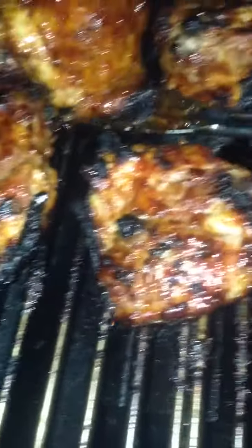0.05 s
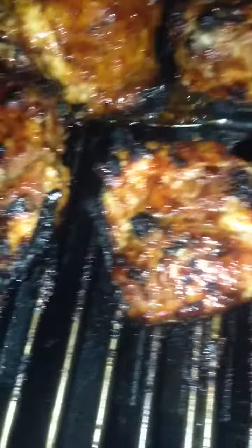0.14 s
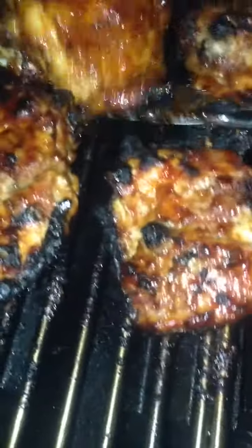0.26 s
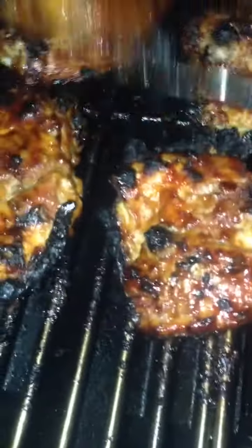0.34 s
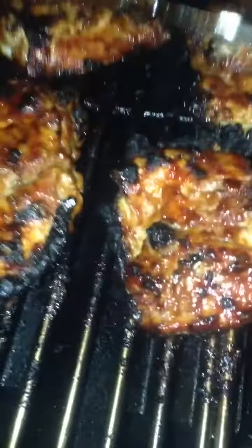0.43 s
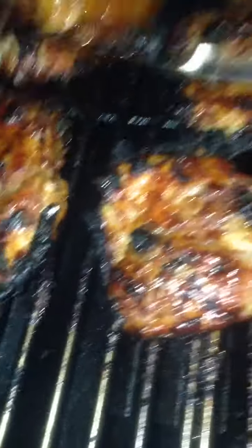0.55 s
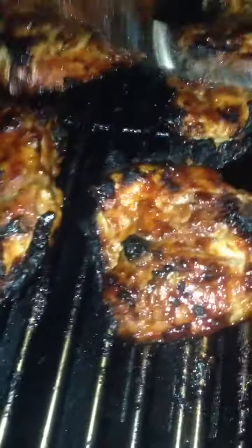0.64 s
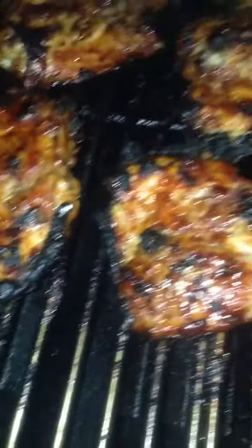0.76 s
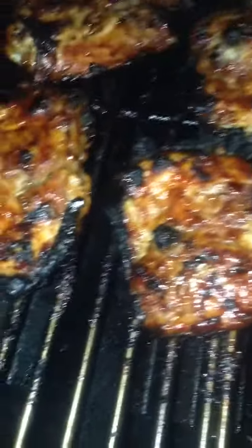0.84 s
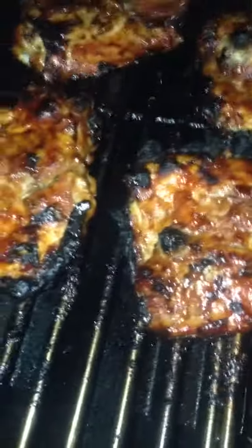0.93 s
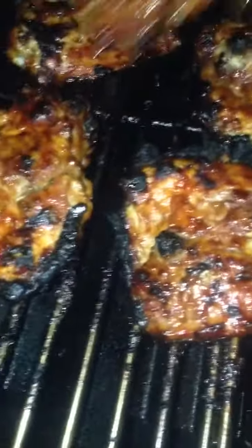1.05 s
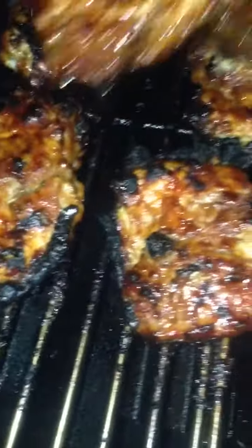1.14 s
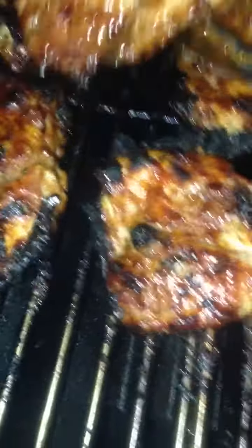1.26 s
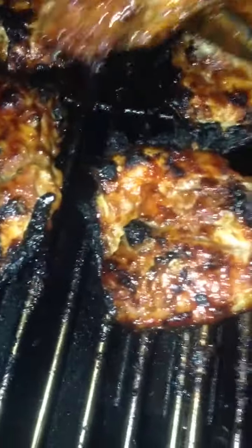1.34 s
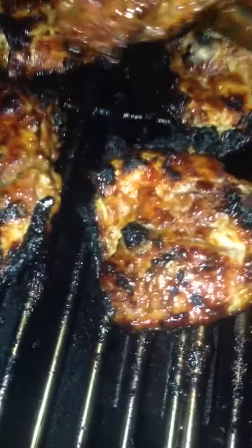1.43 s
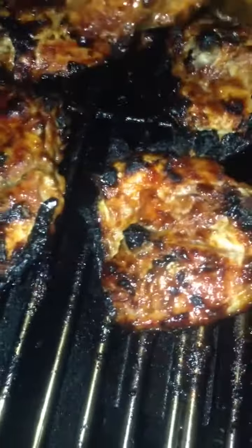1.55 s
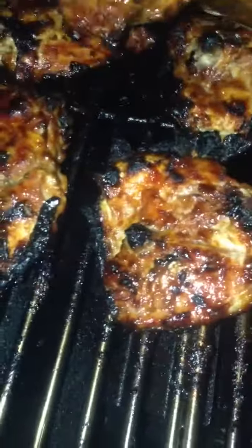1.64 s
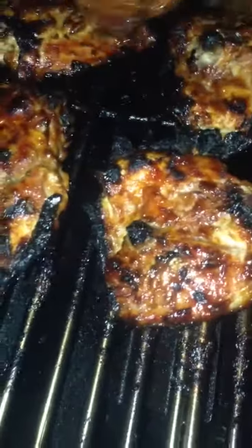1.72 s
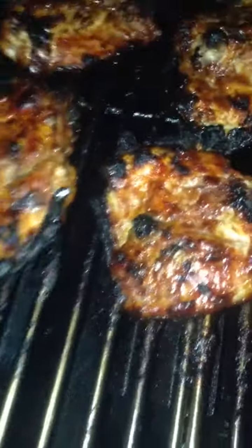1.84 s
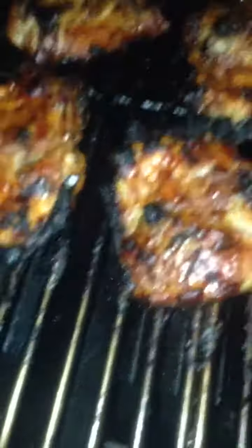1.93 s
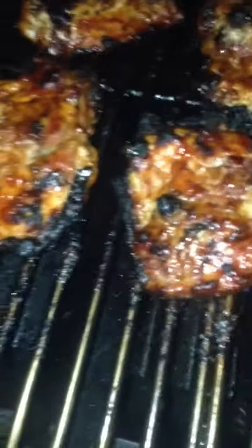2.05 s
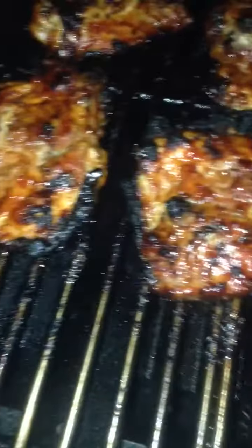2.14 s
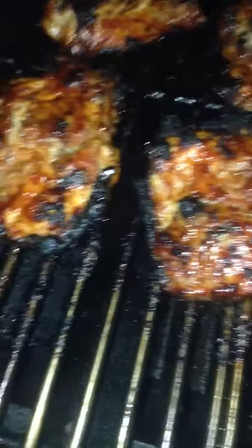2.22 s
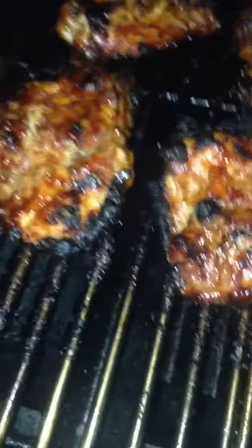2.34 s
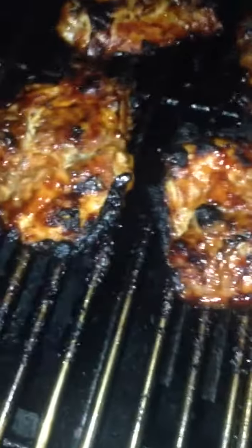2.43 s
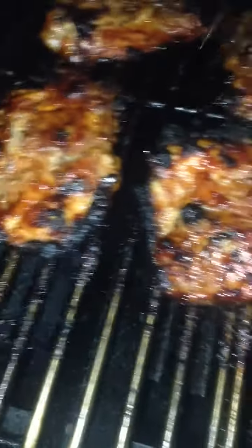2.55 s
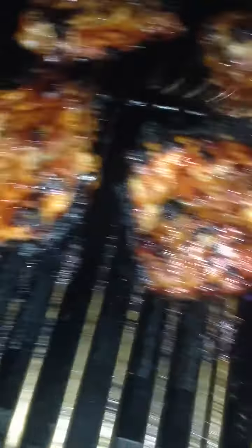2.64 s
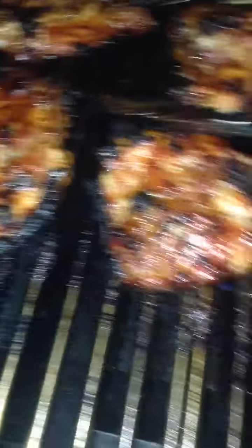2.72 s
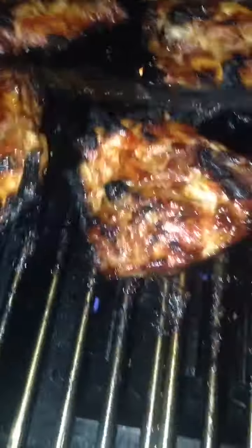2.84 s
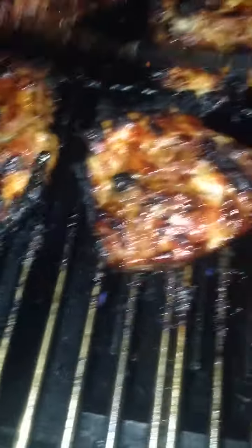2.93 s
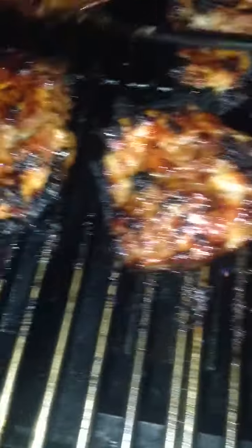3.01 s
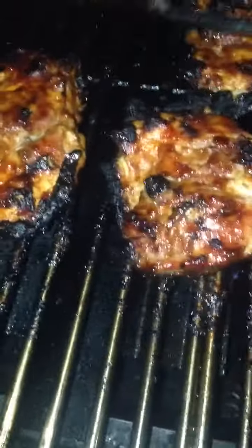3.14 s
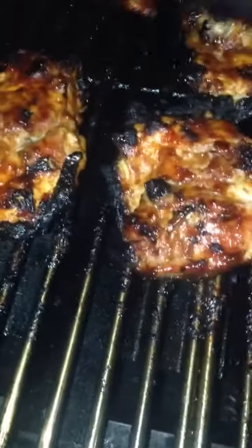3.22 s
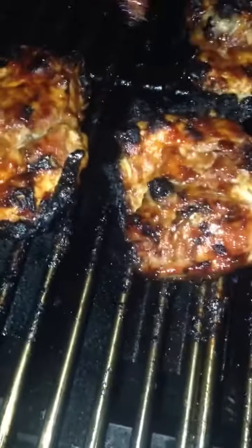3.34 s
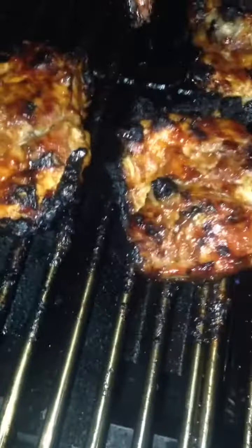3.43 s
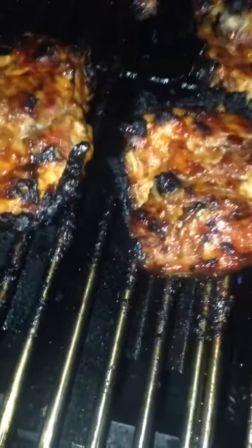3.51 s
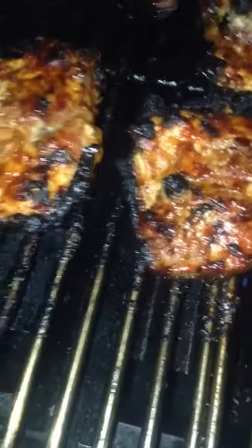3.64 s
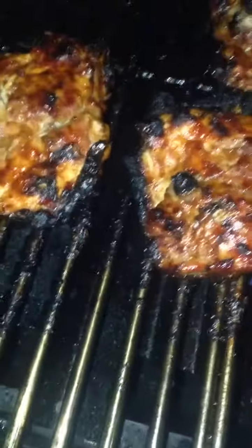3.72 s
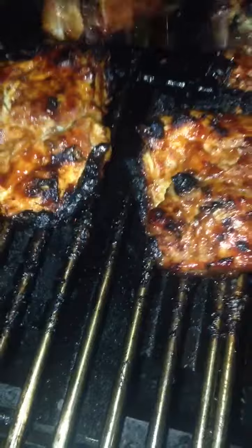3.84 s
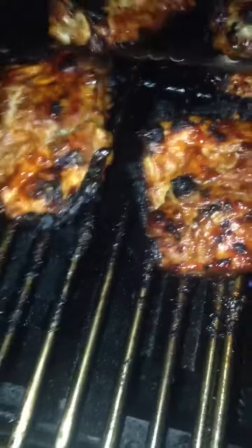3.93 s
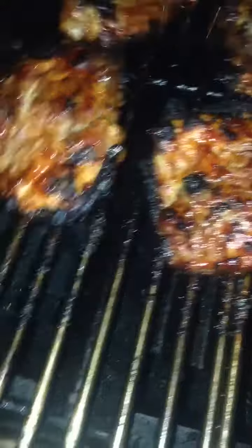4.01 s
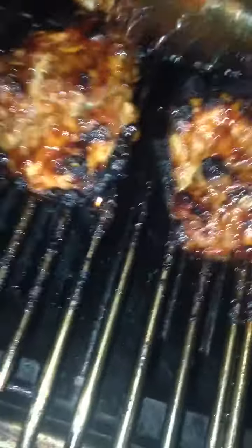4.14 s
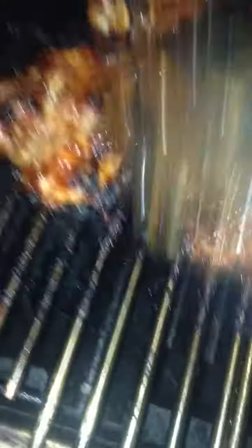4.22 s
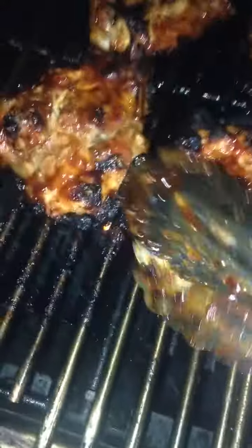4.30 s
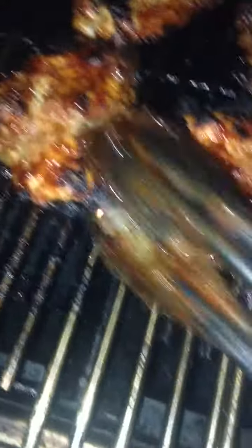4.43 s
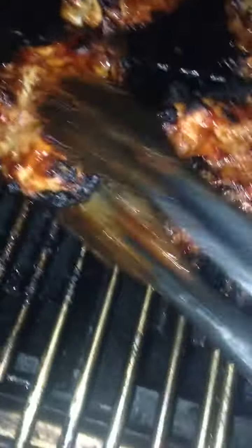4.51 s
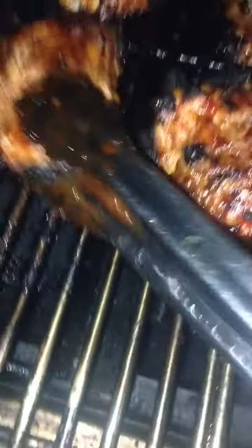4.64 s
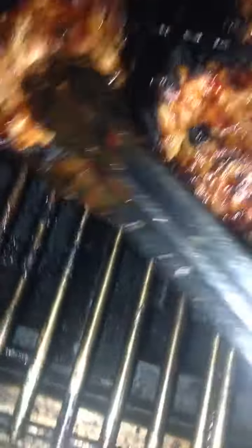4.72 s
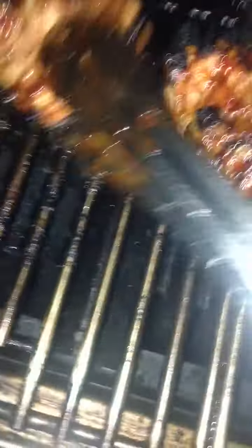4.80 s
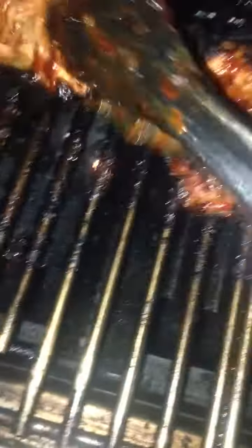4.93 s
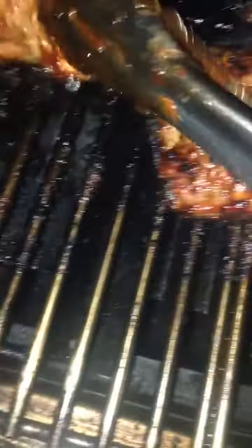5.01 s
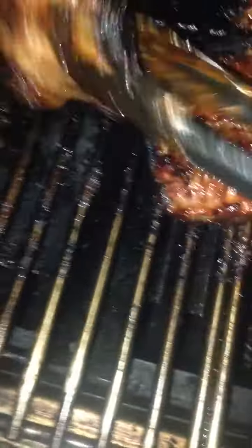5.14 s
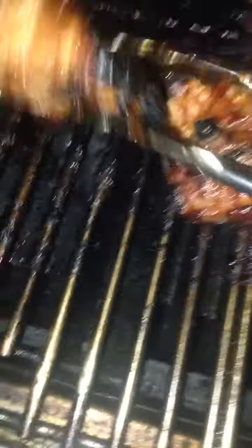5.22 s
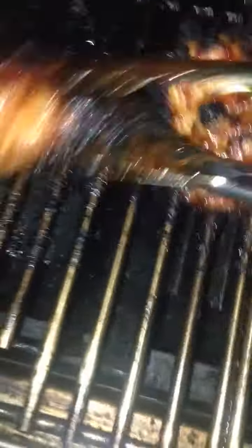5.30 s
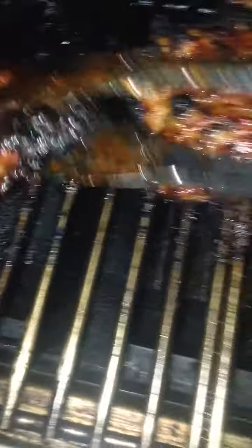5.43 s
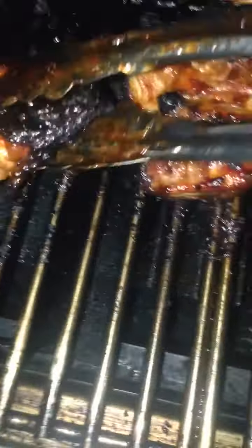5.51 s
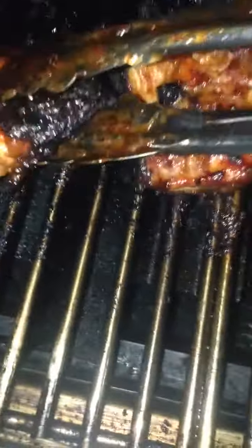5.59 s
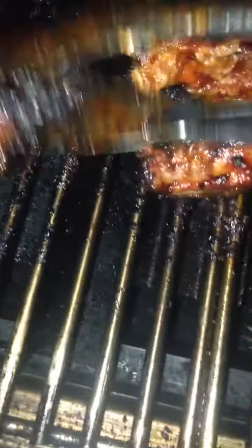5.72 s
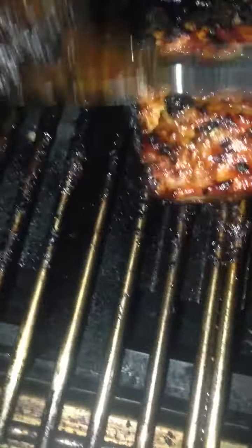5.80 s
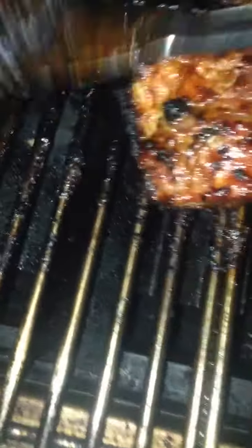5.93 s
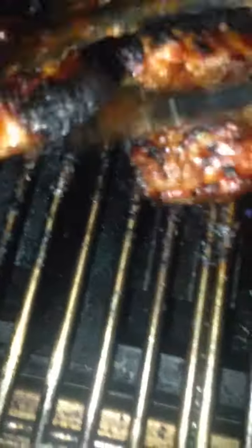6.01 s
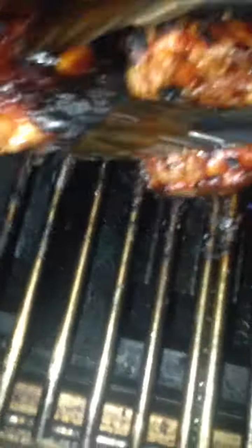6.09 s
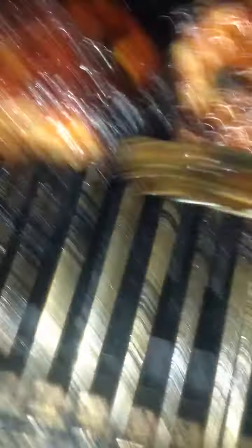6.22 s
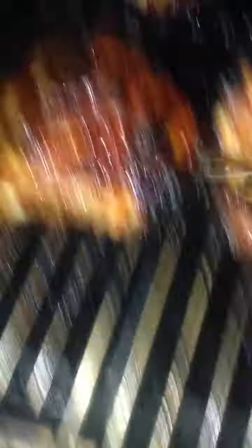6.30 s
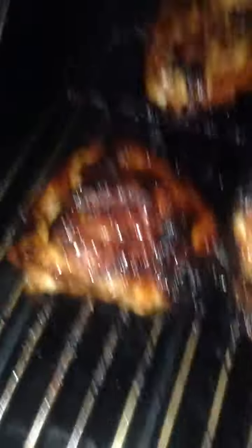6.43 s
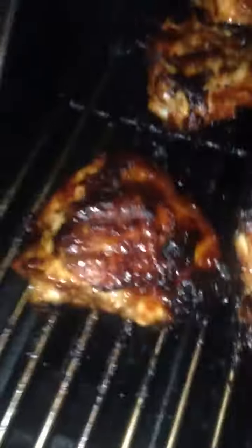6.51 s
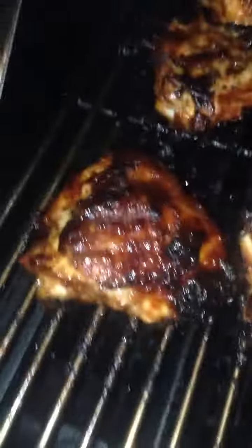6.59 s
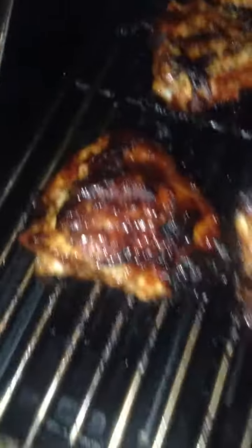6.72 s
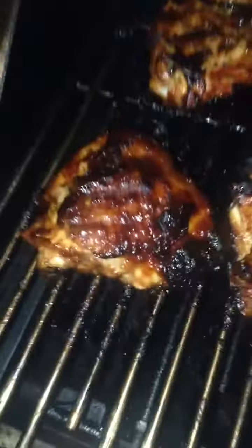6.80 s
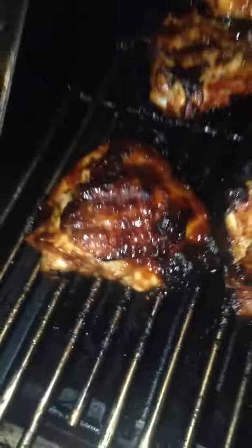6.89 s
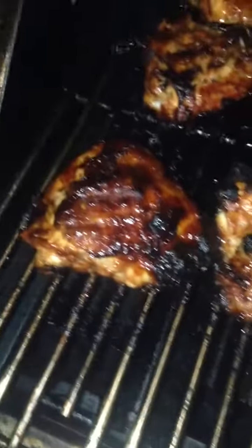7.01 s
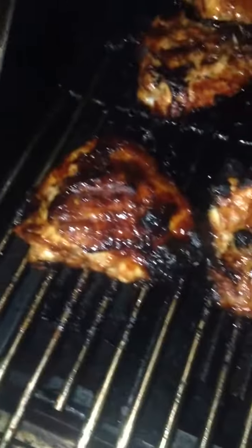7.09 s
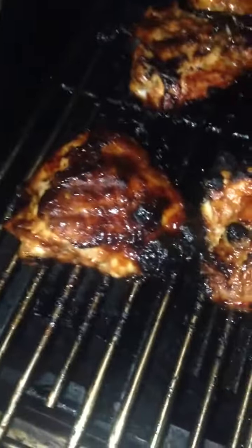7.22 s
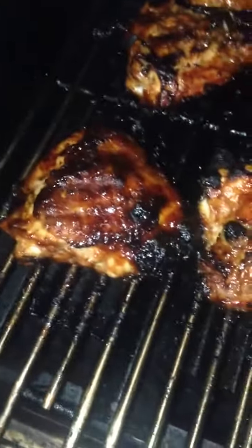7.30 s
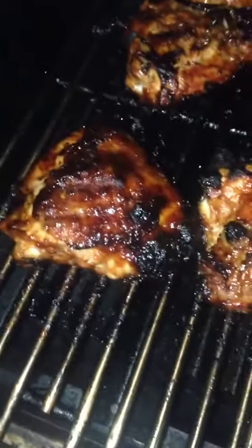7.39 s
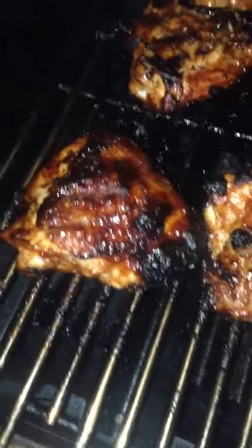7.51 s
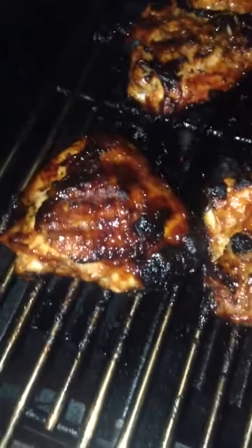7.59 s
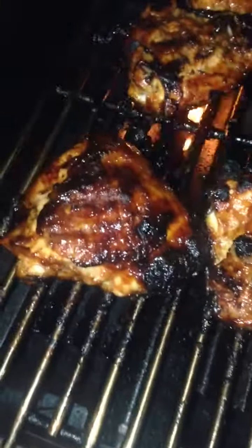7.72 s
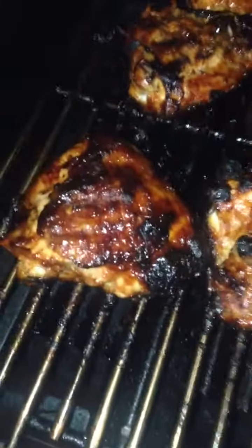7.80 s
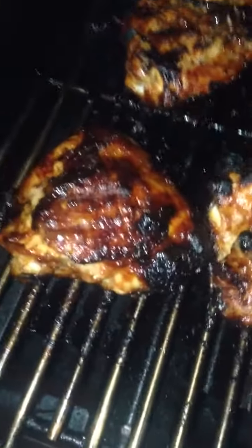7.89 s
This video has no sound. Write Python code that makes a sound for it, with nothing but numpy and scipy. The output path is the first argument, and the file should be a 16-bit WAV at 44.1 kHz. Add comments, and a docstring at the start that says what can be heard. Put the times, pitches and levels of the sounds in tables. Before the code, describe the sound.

Close to a hand-held microphone, chicken fries on a grill grate with a steady, crackling hiss, spitting and popping over the faint low murmur of the gas flame. The sizzle slowly softens, and there are a few dull handling bumps. Past the middle, tongs give a short metallic knock, sticky glaze briefly rasps off the bars and the hiss grows. A second knock follows, then more pops and a final surge.

```python
"""Sauced chicken sizzles on a gas grill, close to a hand-held mono microphone.
Countless tiny steam bubbles burst into a hiss that surges when juice meets hot metal; larger ones
pop and spit. The burner murmurs in the hollow of the grill, soft bumps reach the microphone,
dripping fat flares up and steam sings under the meat. Later, tongs knock on the loose grate
and sticky glaze tears off the bars."""
import sys
import numpy as np
from scipy import signal
from scipy.fft import rfft, irfft
from scipy.io import wavfile
from scipy.ndimage import uniform_filter1d

SR = 44100
rng = np.random.default_rng(int(sys.argv[2]) if len(sys.argv) > 2 else 0)


def bounce(signal):
    """Save signal as a 16-bit WAV file at the path given by the first command-line argument."""
    frames = np.transpose(np.atleast_2d(signal))
    limited = np.clip(frames, -1, 1)
    pcm = np.round(limited * 32767).astype(np.int16)
    wavfile.write(sys.argv[1], SR, pcm)


N = 350595
TIME, HZ = np.arange(N) / SR, np.fft.rfftfreq(N, 1 / SR)

# The tone of the sizzle, from low to high: (frequency [Hz], level [dB])
SIZZLE_TONE = [(260, -11), (450, -10), (514, -15), (641, -10), (765, -6), (836, -9.5), (1070, -7.5),
               (1190, -3.5), (1860, -4), (2000, -1.5), (3940, 2), (6700, 1.5), (13600, 0), (14600, 1),
               (15300, -2.5)]
# Juice meets hot metal and flashes to steam:
# (start [s], rise [s], hold [s], fade [dB/s], level [dB], fine fizz against that level [dB])
JUICE_SURGES = [(-0.03, .02, 0.036, 20.5, -31, 4), (0.5, 0.018, 0.094, 147, -46, 5),
                (0.794, 0.041, 0.25, 41, -36, 7), (1.908, .03, .04, 120, -40, -6),
                (2.2, .03, .04, 95, -42.5, -6), (2.69, 0.018, 0.021, 200, -39, -10),
                (4.415, 0.12, 0.12, 1, -41.2, 3.5), (4.88, 0.054, .5, -2.5, -40.5, -3.5),
                (5.12, 0.018, 0.34, 9, -44.5, 1.5), (6.143, 0.048, 0.24, 32, -43, 2.5),
                (6.28, 0.073, 0.02, 44, -38.5, 4.5), (6.672, 0.023, 0.035, 119, -40.5, -9),
                (7.332, 0.22, 0.29, 58, -43, 2), (7.553, 0.028, 0.073, 30, -34, 4)]
# The boiling eases off for a moment: (time [s], half length [s], depth [dB])
BOIL_LULLS = [(0.666, 0.022, 3.5), (0.77, 0.074, 1), (1.78, 0.041, 1), (2.152, 0.045, 2), (2.62, 0.06, 1.4),
              (3.2, 0.55, 0.4), (3.813, 0.034, 1.5), (4.04, 0.04, 1), (4.375, 0.065, 2.2), (4.67, 0.035, 1),
              (4.85, 0.02, 1), (6.1, 0.043, 2), (7.18, 0.31, 1.2)]
# How loud the burner's flame is: (time [s], level [dB])
FLAME_LEVELS = [(0.0, -56.5), (0.74, -56), (0.89, -54), (1.58, -57.5), (3.13, -59), (4.25, -66.5),
                (4.79, -58.5), (5.73, -62.5), (7.22, -57.5), (7.6, -51.5), (7.95, -59)]
# Pitches at which the air inside the grill rings: (frequency [Hz], width [Hz], level [dB])
FIREBOX_RESONANCES = [(167, 57, -0.5), (280, 97, -1.5), (370, 65, -2.5), (570, 100, -8)]
# Soft bumps on the microphone: (time [s], level [dB], frequency [Hz])
MIC_BUMPS = [(0.021, -36.5, 70), (0.172, -43, 75), (2.878, -44, 179), (3.32, -50, 65), (3.40, -44, 60),
             (3.443, -37, 120), (3.484, -47, 100), (3.545, -43, 60), (3.587, -45, 125), (3.627, -39.5, 160),
             (3.655, -43, 75), (3.682, -53, 190), (4.01, -44, 85), (4.08, -53, 70), (4.864, -40, 107),
             (4.976, -42, 136), (4.996, -41.5, 110), (5.091, -48, 70), (6.04, -53, 80), (6.404, -47, 75)]
# Bursting blisters that stand out: (time [s], level [dB], pitch [Hz], width [octaves])
BLISTER_POPS = [(0.0396, -29, 2700, 2.6), (0.1228, -28, 8000, 2.8), (0.209, -27, 4970, 3.8),
                (0.343, -31.5, 1160, 4.8), (0.36, -27.5, 4970, 3.7), (0.617, -29.5, 4800, 1.8),
                (0.7139, -34.5, 400, 2.3), (0.785, -32, 6000, 9.2), (0.913, -30, 11000, 2.8),
                (1.1078, -31, 1960, 1.8), (1.117, -28, 5400, 3.4), (1.24, -34.5, 3600, 1.6),
                (1.391, -31.5, 2900, 2.6), (1.808, -40.5, 650, 2), (1.8207, -35, 8000, 2.4),
                (1.8621, -29, 3600, 3.2), (1.938, -35, 3500, 2.4), (2.041, -37.5, 1000, 2.8),
                (2.059, -39, 6500, 2.4), (2.3804, -33, 4800, 2.8), (2.451, -33, 9000, 2.6),
                (2.506, -30, 7000, 2.8), (2.995, -40, 1190, 1.8), (3.0496, -36, 2400, 3.2),
                (3.3643, -38, 5000, 2.1), (3.5173, -38.5, 2920, 2.5), (3.5605, -37, 5000, 3),
                (3.9263, -38.5, 5000, 2), (3.9821, -34, 1770, 1.9), (4.216, -38, 3600, 1),
                (4.2502, -34.5, 3800, 2.9), (4.6, -33, 5400, 3.1), (4.6343, -31, 9500, 1.8),
                (4.7252, -35, 6500, 2.1), (4.9105, -38, 5000, 2.5), (4.958, -35, 2400, 2.4),
                (5.165, -33.5, 8000, 2.6), (5.3075, -31, 9630, 1.4), (5.404, -35, 5500, 3.7),
                (5.432, -37, 1090, 3.1), (5.5346, -37.5, 1700, 3.4), (5.576, -32, 11500, 1.7),
                (5.658, -42, 1810, 3), (5.7912, -27.5, 11000, 4.8), (5.809, -36, 3200, 3),
                (5.848, -37, 2400, 3.1), (5.8538, -41, 1000, 2.8), (6.173, -32.5, 5200, 1.8),
                (6.2075, -42, 700, 2.4), (6.447, -34, 9000, 2), (6.536, -34.5, 1900, 2),
                (6.587, -36.5, 1600, 1.3), (6.7039, -33, 1910, 2), (6.721, -39, 2800, 1.8),
                (6.747, -40, 900, 3.3), (6.871, -44.5, 1600, 1.3), (6.93, -37, 1500, 1.3),
                (7.285, -41.5, 800, 2), (7.3885, -37, 1300, 1.8), (7.4355, -33.5, 2000, 3),
                (7.6197, -30.5, 3300, 3.3), (7.677, -22.3, 10000, 3.1), (7.779, -34.5, 1900, 1.8),
                (7.874, -31.5, 5440, 2.2)]
# Pitches that cancel between grate and pan: (frequency [Hz], width [Hz], share removed [0-1])
PAN_NOTCHES = [(480, 39, 0.41), (870, 130, 0.46)]
# Dripping fat catches fire:
# (start [s], end [s], start pitch [Hz], end pitch [Hz], width [Hz], level [dB])
FAT_FLARES = [(0.215, 0.28, 302, 280, 109, -50.5), (0.72, 0.865, 146.6, 176, 40, -49),
              (0.785, 0.885, 303, 404, 100, -50.5), (2.17, 2.34, 366, 374, 110, -57),
              (2.84, 2.94, 199, 175, 80, -53), (7.635, 7.715, 187, 179, 60, -52.5),
              (7.68, 7.77, 259, 354, 80, -48), (7.725, 7.78, 155, 144, 50, -53)]
# Fat spits in runs of bubbles: (start [s], length [s], level [dB], pitch [Hz], width [octaves])
FAT_SPITS = [(0.508, 0.03, -36, 4000, 2.6), (0.603, 0.031, -39, 3630, 1.5), (0.868, 0.0092, -30, 9000, 2.6),
             (0.978, 0.014, -30, 6500, 3.6), (2.861, 0.034, -41.5, 4000, 2.6),
             (2.937, 0.014, -44, 3400, 1.2), (4.606, 0.012, -36, 7000, 2), (5.436, 0.014, -42, 1600, 2),
             (6.151, 0.022, -43, 4250, 0.9), (6.308, 0.012, -38.5, 3900, 0.83),
             (6.52, 0.016, -45, 2520, 1.5), (7.028, 0.018, -42, 1700, 1.9),
             (7.132, 0.017, -36.5, 2600, 4.4), (7.385, 0.017, -44, 1470, 1.2),
             (7.70, 0.064, -42, 1600, 1.6)]
# Steam sings in gaps under the meat:
# (start [s], end [s], start pitch [Hz], end pitch [Hz], width [Hz], level [dB])
STEAM_WHISTLES = [(0.66, 0.92, 4320, 4340, 220, -55), (2.86, 2.886, 1670, 1650, 140, -47.5),
                  (2.86, 2.885, 4500, 4600, 900, -42), (6.223, 6.6, 1785, 1310, 260, -55),
                  (7.5, 7.68, 9000, 7940, 180, -51)]
# Tongs knock on the grate; the crack is low with meat between the tips, high on bare steel:
# (time [s], ring level [dB], crack level [dB], crack pitch [Hz], rattle level [dB])
TONG_KNOCKS = [(4.622, -24, -35.5, 2050, -44.5), (6.0598, -24, -34.5, 3750, -62)]
# Tones of greasy tongs, damped by hand and meat: (frequency [Hz], level [dB], time to fade 60 dB [s])
TONG_TONES = [(1350, -6, 0.029), (1970, -8, 0.032), (2220, -6, 0.026), (3050, -6, .026), (3300, -6.5, .024),
              (4100, -5, 0.031), (7100, 5, 0.015)]
# Pitches at which the loose grate rings: (frequency [Hz], width [Hz], level [dB])
GRATE_RESONANCES = [(372, 180, -9), (635, 90, 4)]
# Sticky glaze tears off the bars as the meat is lifted: (start [s], length [s], level [dB])
GLAZE_PEELS = [(4.866, 0.11, -43.5)]

SPRAY_MS = 2.06  # how quickly the spray of a wet bubble dies away
ONSET_SAMPLES = 256  # the level of a pop or crack is set over its first 6 ms


def gain_of(db):
    """Turns decibels into a number to multiply by."""
    return 10 ** (np.asarray(db) / 20)


def evened(x):
    """Scales a signal to an average strength (rms) of 1."""
    return x / np.sqrt(np.mean(x ** 2) + 1e-20)


def add(mix, start_s, sound):
    """Mixes a sound in at the given time."""
    part = mix[max(round(start_s * SR), 0):][:len(sound)]
    part += sound[:len(part)]


def filtered(x, response):
    """Turns each frequency in HZ up or down by its gain in the response."""
    return irfft(rfft(x) * response, N)


def below(edge_hz, order):
    """A response that keeps the lows; a higher order cuts more steeply."""
    return 1 / np.sqrt(1 + (HZ / edge_hz) ** (2 * order))


def above(edge_hz, order):
    """A response that keeps the highs."""
    return 1 - below(edge_hz, order) ** 2


def resonance(hz, width_hz):
    """The response of something that rings at one pitch, with gain 1 there."""
    return 1 / (1 + 1j * (HZ ** 2 - hz ** 2) / (width_hz * HZ + 1e-9))


def wander(slow_hz, fast_hz):
    """A random drift of strength 1 that moves mostly between two rates."""
    response = below(fast_hz, order=2) * HZ / (HZ + slow_hz) ** 1.5
    return evened(filtered(rng.standard_normal(N), response))


def by_chance(per_s, samples=N):
    """Picks random sample positions, about per_s of them a second."""
    return np.flatnonzero(rng.random(samples) < per_s / SR)


def boil(fry_db=-33.5, drying_db_per_s=2):
    """Levels of the sizzle and its fine fizz in dB: the meat slowly dries, fresh juice adds surges."""
    power = gain_of(fry_db - drying_db_per_s * TIME) ** 2
    fizz_power = power * gain_of(-0.9 - 0.75 * TIME) ** 2  # the fizz fades first
    for start, rise_s, hold_s, fade_db_per_s, db, fizz_db in JUICE_SURGES:
        age = TIME - start
        faded_db = fade_db_per_s * np.maximum(age - rise_s - hold_s, 0)
        steam = np.clip(age / rise_s, 0, 1) * gain_of(db - faded_db) ** 2
        power += steam
        fizz_power += steam * gain_of(fizz_db) ** 2
    lull_db = sum(db * np.exp(-((TIME - s) / half_s) ** 2) for s, half_s, db in BOIL_LULLS)
    return 10 * np.log10(power) - lull_db, 10 * np.log10(fizz_power) - lull_db


def sputter(per_s, decay_s, steady_s):
    """Splashes from a steady supply of juice flash to steam and die away; the result hovers near 1."""
    splashes = (rng.random(N) < per_s / SR) * np.minimum(rng.exponential(1, N), 3)
    flashes = signal.lfilter([1], [1, -np.exp(-1 / (decay_s * SR))], splashes)
    supply = uniform_filter1d(flashes, round(steady_s * SR))
    return flashes / (supply + flashes.mean() / 20)


def burst(centre_hz, octaves, decay_ms, scatter):
    """One bubble: a snap, a short spray of steam and echoes from the grate; its size sets the pitch."""
    t = np.arange(1024) / SR
    spray = np.exp(-1000 * t / max(decay_ms, 0.2))
    echoes = 0.053 * np.exp(-t / 0.0068)
    snap = scatter * rng.standard_normal(len(t)) * (spray + echoes)
    snap[0] = 1
    reach = 2 ** (max(octaves, 0.5) / 2)
    edges_hz = np.clip([centre_hz / reach, centre_hz * reach], 50, SR / 2 - 1000)
    return signal.sosfilt(signal.butter(2, edges_hz, "band", fs=SR, output="sos"), snap)


def crackle(per_s, spread_db, largest, decay_ms, pitches=32):
    """A swarm of bubbles, most tiny and a few large, balanced so that no pitch stands out."""
    at = by_chance(per_s)
    kind, rank, sign = rng.random((N, 3))[at].T
    size = gain_of(-spread_db * np.log(rank + np.exp(-largest))) * np.sign(sign - 0.5)
    out, power = np.zeros(N), 0
    for k, centre_hz in enumerate(np.geomspace(700, 15000, pitches)):
        bubble = evened(burst(centre_hz, 2.33, decay_ms * rng.uniform(0.4, 1.17), scatter=0.31))
        chosen = (kind * pitches).astype(int) == k
        clicks = np.zeros(N)
        clicks[at[chosen]] = size[chosen]
        out += signal.oaconvolve(clicks, bubble)[:N]  # each click becomes a bubble
        power = power + abs(rfft(bubble)) ** 2
    colour = np.interp(HZ, np.linspace(0, SR / 2, len(power)), uniform_filter1d(power, size=9))
    return evened(filtered(out, 1 / np.sqrt(colour)))


def wall_echoes(x, strength, sway_s, count=7):
    """Adds close echoes from lid and walls; their paths shift as the hand moves, so the tone drifts."""
    out = x.copy()
    for delay_s in np.linspace(0.0009, 0.0048, count):
        path_s = delay_s * rng.uniform(1.0, 1.107)
        hand = np.sin(2 * np.pi * (rng.uniform(0.112, 0.397) * TIME + rng.random()))
        echo = np.interp(TIME - path_s - sway_s * hand, TIME, x)
        out += strength * rng.choice([-1, 1]) * echo
    return out


def sizzle(level_db, fizz_db, usual_db=-42.5):
    """Steam hiss, fine frying and coarser spitting swell and fade together with the boil."""
    activity = 0.62 + 0.35 * sputter(per_s=170, decay_s=0.007, steady_s=0.083)
    hiss = evened(rng.standard_normal(N) * np.sqrt(activity))
    frying = crackle(2900 * activity, spread_db=2.0, largest=4.1, decay_ms=0.48)
    spitting = crackle(260 * activity, spread_db=3.5, largest=3.0, decay_ms=1.7)
    spitting = filtered(spitting, below(3700, order=1))  # larger bubbles are duller
    blend = gain_of(1.0) * hiss + frying + gain_of(-0.5) * spitting
    blend = wall_echoes(blend, strength=0.079, sway_s=0.00012)
    hz, db = np.transpose(SIZZLE_TONE)
    tone = gain_of(np.interp(np.log(HZ + 1), np.log(hz), db))
    blend = filtered(blend, tone * above(190, order=2))
    bubbling_db = usual_db - 9 + 0.85 * (level_db - usual_db)  # the lows are softer and swell less
    unrest = wander(5.2, 7.8)  # the boil is uneven, most of all for the large bubbles
    low, not_high = below(2170, order=3) ** 2, below(8100, order=3) ** 2
    bubbling = evened(filtered(blend, low)) * gain_of(bubbling_db + unrest)
    body = evened(filtered(blend, not_high - low)) * gain_of(level_db - 1.67 + 0.5 * unrest)
    fizz = evened(filtered(blend, 1 - not_high)) * gain_of(fizz_db + 1.0 + 0.35 * unrest)
    return gain_of(-3.0) * (bubbling + body + fizz)


def flame():
    """The swirling flame makes the air inside the grill ring, over a faint steady rumble."""
    firebox = sum(gain_of(db) * resonance(hz, width) for hz, width, db in FIREBOX_RESONANCES)
    swirl = rng.standard_normal(N) * gain_of(3.6 * wander(14, 77))
    roar = evened(filtered(swirl, firebox * below(620, order=3) * above(113, order=3)))
    rumble = filtered(rng.standard_normal(N), below(120, order=2) * above(32, order=3))
    roar_db = np.interp(TIME, *np.transpose(FLAME_LEVELS)) + 0.5 + 1.1 * wander(1.9, 5.7)
    return roar * gain_of(roar_db) + gain_of(-70.5) * evened(rumble)


def bumps(shudder_db=-17.5, shudder_s=0.046):
    """Each bump on the microphone is one low push and pull, with a short uneven shudder around it."""
    out, shudder_level = np.zeros(N), np.zeros(N)
    around = np.arange(-8000, 8000) / SR
    shudder = filtered(rng.standard_normal(N), below(110, order=2) * above(50, order=3))
    shudder = evened(shudder * gain_of(7.0 * wander(12, 30)))
    for s, db, hz in MIC_BUMPS:
        t = around[s + around >= 0]
        push_pull = np.sin(2 * np.pi * hz * t) * np.exp(-(hz * t / 0.43) ** 2)
        add(out, s + t[0], gain_of(db) * push_pull)
        add(shudder_level, s + t[0], gain_of(db) * np.exp(-((t - 0.015) / shudder_s) ** 2))
    return out + gain_of(shudder_db) * shudder_level * shudder


def pops(level_db, dry_above_hz=9500):
    """Blisters of sauce and fat burst one by one: small ones snap, large wet ones plop."""
    out = np.zeros(N)
    for s, db, centre_hz, octaves in BLISTER_POPS + stray_pops(level_db):
        wetness = 1 / (1 + (centre_hz / dry_above_hz) ** 2)
        pop = burst(centre_hz, octaves, SPRAY_MS * wetness, scatter=0.48 * np.sqrt(wetness))
        add(out, s, gain_of(db) * pop / pop[:ONSET_SAMPLES].std())
    notches = [1 - share * resonance(hz, width) for hz, width, share in PAN_NOTCHES]
    return gain_of(-1.2) * filtered(out, np.prod(notches, axis=0))


def stray_pops(level_db, low_hz=420, high_hz=9000, db_per_octave=3.5, octaves=2.6):
    """Lists lesser blisters at random moments; their level follows the boil, and low ones are softer."""
    at = by_chance(per_s=6)
    pitch, softness = rng.random((N, 2))[at].T
    hz = low_hz * (high_hz / low_hz) ** pitch
    db = level_db[at] - 3.5 + db_per_octave * np.log2(hz / 2000) - (2 * softness - 1)
    return [(*row, octaves) for row in zip(at / SR, db, hz)]


def snaps(fizz_db, above_fizz_db=12, scatter_db=2.5, centre_hz=8500):
    """Droplets of fat crack dryly at random moments; they follow the fizz and stand out of it."""
    out = np.zeros(N)
    at = by_chance(per_s=16)
    for i, (strength, pitch) in zip(at, rng.uniform(-0.9, 1, (N, 2))[at]):
        snap = burst(centre_hz * 2 ** (pitch / 2), octaves=2.24, decay_ms=0.6, scatter=0.21)
        peak_db = fizz_db[i] + above_fizz_db + scatter_db * strength
        add(out, i / SR, gain_of(peak_db) * snap / abs(snap).max())
    return out


def singing_flow(rows):
    """A flow of flame or steam holds an unsteady, sliding pitch for a moment."""
    out = np.zeros(N)
    for start, end, start_hz, end_hz, width_hz, db in rows:
        samples = round((end - start) * SR)
        eddies = rng.standard_normal((SR, 2)) @ [1, 1j]  # complex noise shakes both level and pitch
        smoothing = signal.butter(2, width_hz / 2, fs=SR, output="sos")
        wobble = signal.sosfilt(smoothing, eddies)[-samples:]
        glide = np.exp(2j * np.pi * np.cumsum(np.linspace(start_hz, end_hz, samples)) / SR)
        fade = signal.windows.tukey(samples, 0.5)
        add(out, start, gain_of(db) * evened((wobble * glide).real * fade))
    return out


def flares():
    """Flames flutter at a low pitch as dripping fat catches fire."""
    return singing_flow(FAT_FLARES)


def spits(bubbles=12, fade_db=9):
    """A pocket of fat empties in a run of ever weaker bubbles that blur into one soft splutter."""
    out = np.zeros(N)
    for start, length_s, db, centre_hz, octaves in FAT_SPITS:
        run = np.zeros(SR // 4)
        for progress in (np.arange(bubbles) + rng.random(bubbles)) / bubbles:
            bubble = evened(burst(centre_hz, octaves, SPRAY_MS, scatter=0.35))
            add(run, progress * length_s, gain_of(-fade_db * progress) * bubble)
        add(out, start, gain_of(db) * run * np.sqrt(length_s * SR / np.sum(run ** 2)))
    return out


def steam_whistles():
    """Steam whistles briefly through gaps under the meat."""
    return singing_flow(STEAM_WHISTLES)


def tongs(drop_db_per_octave=8):
    """Each knock cracks and briefly rings the steel arms, favouring tones near the crack's pitch."""
    out, t = np.zeros(N), np.arange(4096) / SR
    for s, ring_db, crack_db, crack_hz, _ in TONG_KNOCKS:
        crack = burst(crack_hz, octaves=1.8, decay_ms=2, scatter=0.24)
        add(out, s, gain_of(crack_db) * crack / crack[:ONSET_SAMPLES].std())
        for hz, db, ring_s in TONG_TONES:
            tone_db = ring_db + db - drop_db_per_octave * abs(np.log2(hz / crack_hz))
            add(out, s, gain_of(tone_db - 60 * t / ring_s) * np.sin(2 * np.pi * hz * t))
    return out


def grate(hits_per_s=420, delay_s=0.0043, length_s=0.029, fade_db=5):
    """After a knock the loose grate chatters on its ledge: quick uneven hits ring its low, dull tones."""
    impacts, age = np.zeros(N), np.arange(round(length_s * SR)) / SR
    fade = gain_of(-fade_db * age / length_s)
    for s, *_, rattle_db in TONG_KNOCKS:
        pace, force = rng.standard_normal((2, SR))[:, :len(age)]
        progress = np.cumsum(hits_per_s * (1 + 3 * pace)) / SR
        hits_so_far = np.floor(np.maximum.accumulate(progress))
        hits = np.diff(hits_so_far, prepend=-1) * (1 + 0.36 * force) * np.sign(force)
        add(impacts, s + delay_s, gain_of(rattle_db) * evened(hits * fade))
    body = sum(gain_of(db) * resonance(hz, width) for hz, width, db in GRATE_RESONANCES)
    body *= below(900, order=2)
    return filtered(impacts, body / np.sqrt(np.mean(abs(body) ** 2)))


def peel(centre_hz=3900, scatter_db=6):
    """Threads of glaze snap one after another, each at its own pitch: a wet rasp."""
    out = np.zeros(N)
    for start, length_s, db in GLAZE_PEELS:
        run = np.zeros(SR // 2)
        at = by_chance(per_s=650, samples=len(run))
        for i, (pitch, strength) in zip(at, rng.standard_normal((len(run), 2)).clip(-2, 2)[at]):
            thread = burst(centre_hz * 2 ** (0.19 * pitch), octaves=0.59, decay_ms=1.0, scatter=0.27)
            pull = np.sqrt(np.sin(np.pi * min(i / SR / length_s, 1)))
            add(run, i / SR, pull * gain_of(scatter_db * strength) * evened(thread))
        add(out, start, gain_of(db) * run * np.sqrt(length_s * SR / np.sum(run ** 2)))
    return out


def scene():
    """Everything reaches one microphone, alike in both channels."""
    level_db, fizz_db = boil()
    mono = sizzle(level_db, fizz_db) + steam_whistles() + tongs() + grate()
    mono += flame() + flares() + bumps()
    mono += pops(level_db) + spits() + peel() + snaps(fizz_db)
    return np.array([mono, mono])


def record(dry, lowest_hz=34, highest_hz=15550):
    """The microphone loses the deepest bass, and the recorder cuts the highest treble."""
    bass_cut = signal.butter(3, lowest_hz, "high", fs=SR, output="sos")
    treble_cut = signal.firwin(401, highest_hz, window=("kaiser", 8), fs=SR)
    return signal.oaconvolve(signal.sosfilt(bass_cut, dry), treble_cut[None], "same")


dry = scene()
out = record(dry)
bounce(out)
```